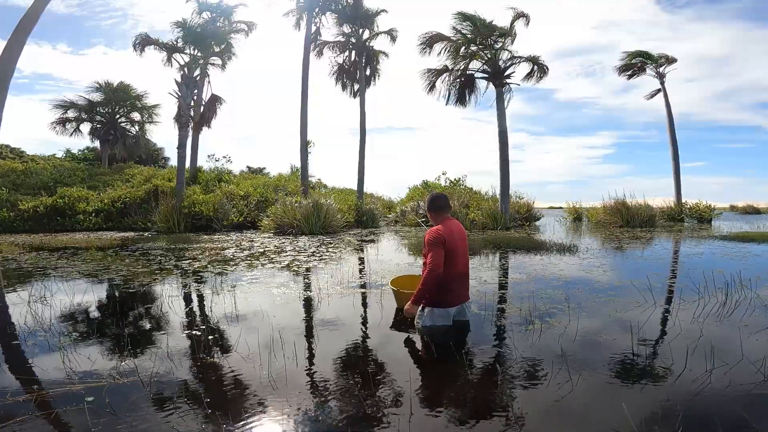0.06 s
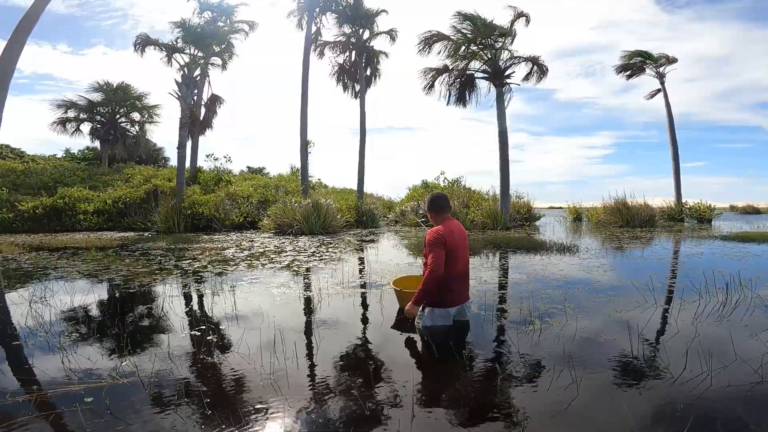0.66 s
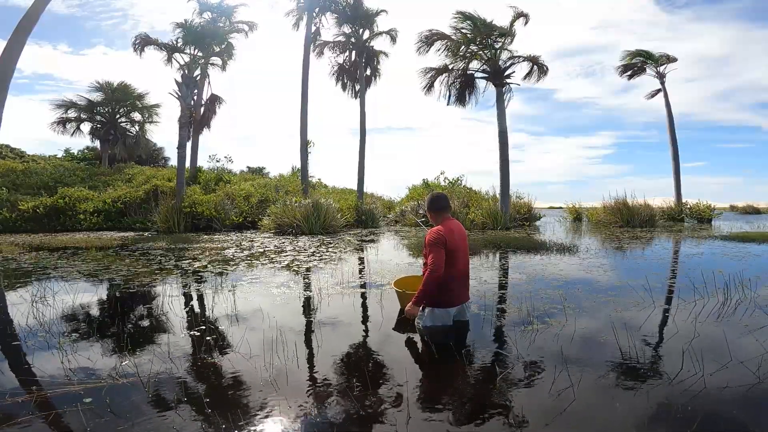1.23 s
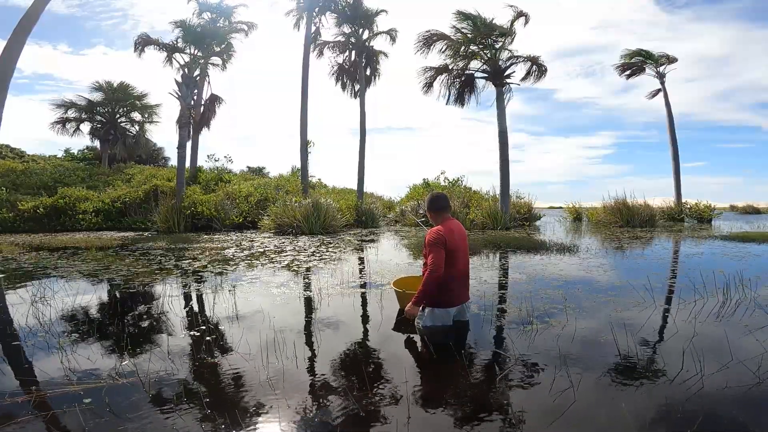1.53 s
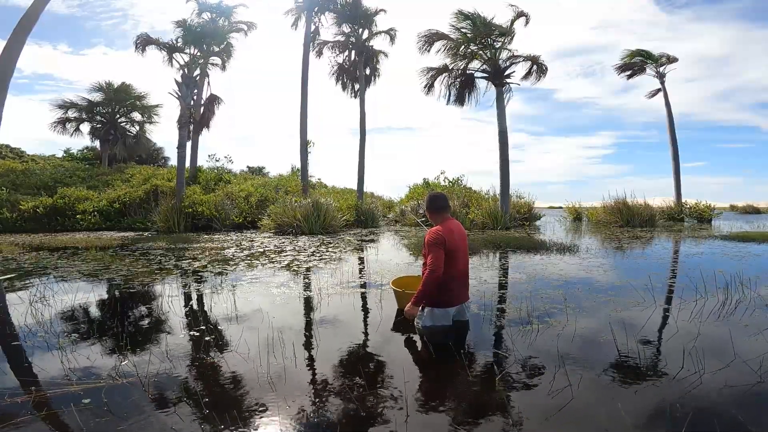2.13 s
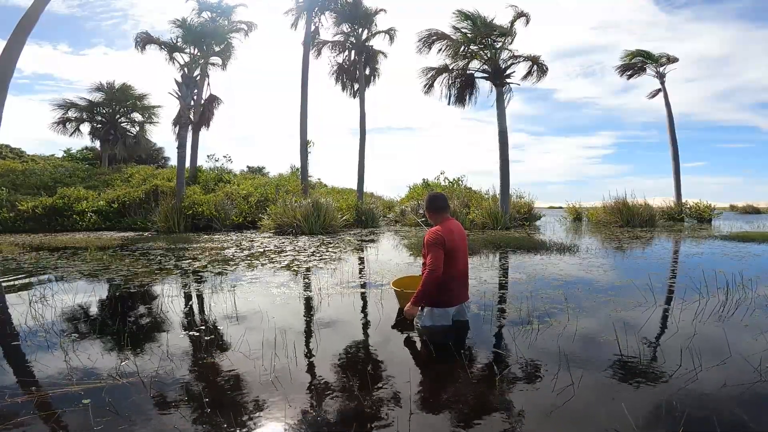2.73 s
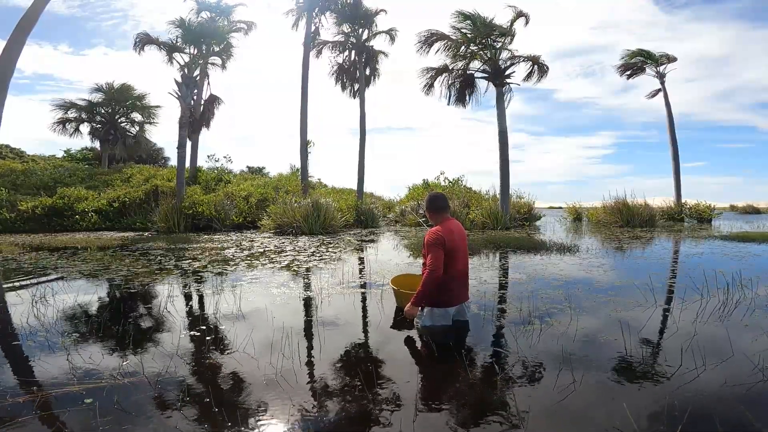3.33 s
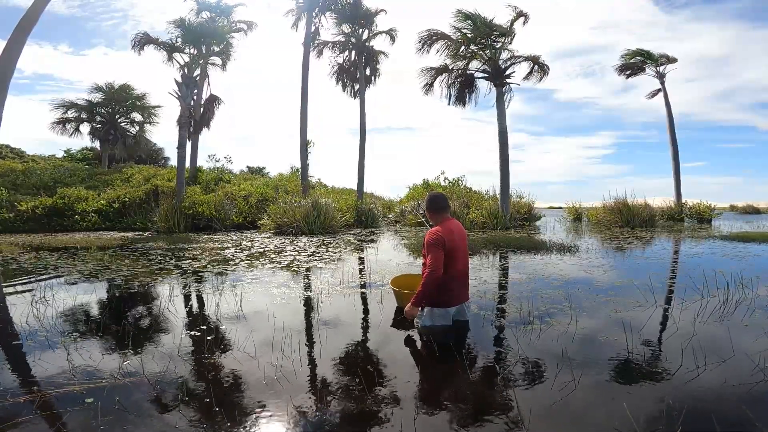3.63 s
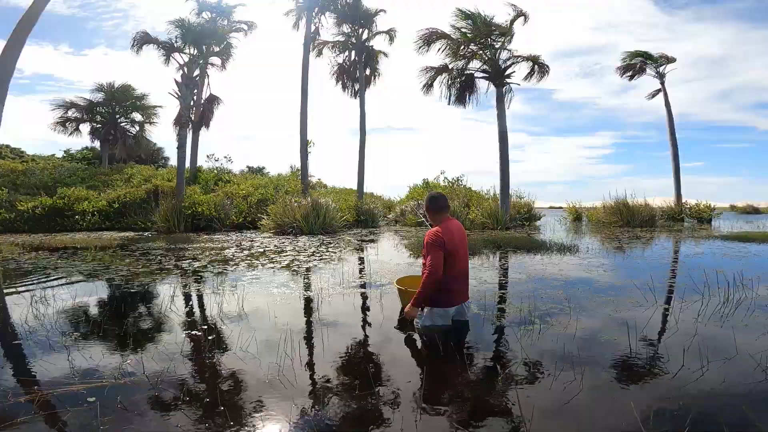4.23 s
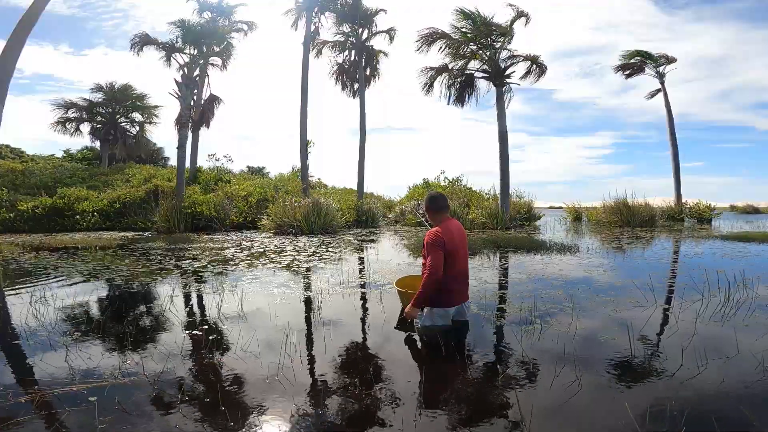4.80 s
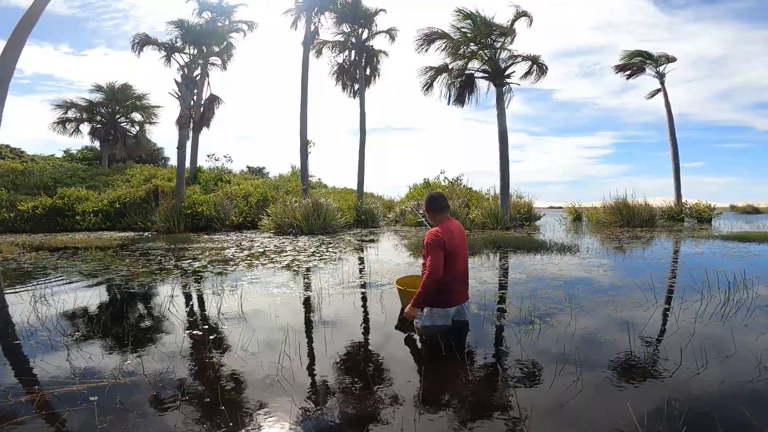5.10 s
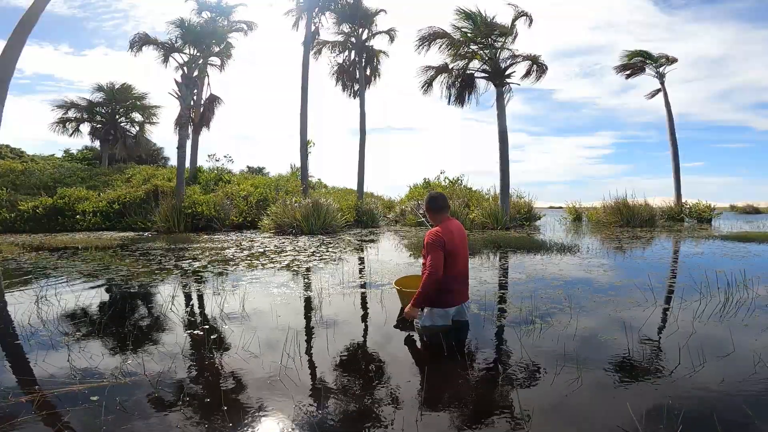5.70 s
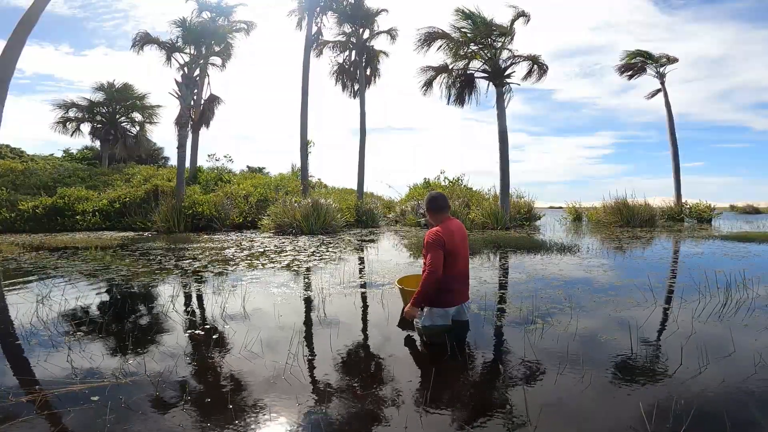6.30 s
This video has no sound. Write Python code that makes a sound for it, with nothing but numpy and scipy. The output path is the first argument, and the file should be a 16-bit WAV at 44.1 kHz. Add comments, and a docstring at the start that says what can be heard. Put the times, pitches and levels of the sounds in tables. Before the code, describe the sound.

Wind blows across a small camera's single microphone in a palm marsh. The low rumble starts light, then swells into close, fluttering buffeting with several dull thumps, strongest early in the gust. It dips for short moments and pushes up again at the end. Throughout, nearby fronds and reeds make an even hiss, and a distant thicket roars faintly.

```python
"""Wind buffeting the one microphone of a small camera, out in a flooded palm marsh.
A gust arrives after a second: eddies on the microphone port make a rolling rumble, a throb,
a faster flutter and a few blunt bumps, their bass peaks held down by the camera's limiter.
Close by, palm fronds and reeds hiss steadily, with a faint, very high shimmer early on;
farther off, a thicket roars softly."""
import sys
import numpy as np
from scipy import signal
from scipy.fft import rfft, irfft, next_fast_len
from scipy.io import wavfile
from scipy.ndimage import uniform_filter1d, minimum_filter1d, map_coordinates

SR = 44100
rng = np.random.default_rng(int(sys.argv[2]) if len(sys.argv) > 2 else 0)


def dump_mix(stems):
    """Bounce the given channels to the path in sys.argv[1] as a 16-bit WAV at rate SR."""
    frames = np.atleast_2d(stems).T  # one column per channel
    limited = np.clip(frames, -1, 1)  # hard clip at full scale
    pcm = np.round(limited * 32767).astype(np.int16)
    wavfile.write(sys.argv[1], SR, pcm)


N = 280035

# Wind in the far thicket and the near foliage. Each row: time in seconds, level in dB.
THICKET_LEVELS = [(0, -45), (1.05, -45), (1.35, -39.5), (2.25, -45), (2.7, -54), (3.4, -51.5), (3.9, -45.5),
                  (4.8, -45), (5.4, -51.5), (6.03, -50.5), (6.35, -40.5)]
RUSH_LEVELS = [(0, -42.5), (.35, -44.3), (1.07, -45), (1.18, -40), (1.65, -41.5), (1.82, -43), (1.93, -42),
               (2.4, -43.5), (3.1, -43.5), (3.65, -41.5), (4.03, -41.5), (4.17, -43.5), (4.65, -43),
               (5.05, -40.7), (5.35, -42), (6.35, -42.5)]
# Sizzle of the leaf tips. Each row: time in seconds, level in dB against the rush.
SIZZLE_LEVELS = [(0, -9.5), (.9, -7.5), (1.3, -11), (2.7, -13), (3.4, -13), (4.25, -9), (5.2, -12),
                 (6.35, -11)]
# Tone of the marsh sounds. Each row: frequency in Hz, relative level in dB.
THICKET_SPECTRUM = [(60, -34), (250, 2.5), (480, -1), (800, -3.5), (1200, -7.5), (2000, -19), (4000, -32),
                    (8000, -70)]
RUSH_SPECTRUM = [(60, -13), (300, -3.5), (700, -5.5), (1200, -0.5), (2000, -1), (3500, -2.5), (5000, -6),
                 (6500, -12), (8500, -23), (11000, -46), (14000, -76)]
SIZZLE_SPECTRUM = [(2000, -15), (4500, -1), (6300, -1), (8000, -3), (10000, -12.5), (11700, -23),
                   (13200, -31), (15000, -42)]
SHIMMER_SPECTRUM = [(10500, -55), (11800, -3), (12800, 0), (14000, -5), (15000, -14)]

# Wind at the microphone. Each row: time in seconds, rumble level in dB before lulls and gusts.
PORT_WIND = [(0, -36), (.33, -31), (.8, -32), (1.02, -31.5), (1.1, -25.5), (1.42, -21), (2.1, -19),
             (3.1, -19.5), (3.58, -23.5), (4.1, -20.5), (4.8, -20.5), (5.75, -20), (6.35, -17.5)]
# The flow leaves the port. Each row: midpoint in seconds, depth in dB, length in seconds.
PORT_LULLS = [(.2, 10.5, 0.129), (0.487, 3, 0.052), (0.618, 10, 0.052), (.93, 6, 0.118), (1.24, 3.5, .1),
              (1.73, 3, 0.078), (2.396, 3, 0.0397), (3.876, 3, 0.056), (4.028, 7.5, .06), (4.195, 5, .06),
              (4.602, 10.5, .1), (5.094, 2, 0.0485), (5.488, 8.5, .05), (5.995, 4.5, .15)]
# Short gusts on the port. Each row: midpoint in seconds, added flutter's level in dB, length in seconds.
PORT_GUSTS = [(0.068, -41.5, 0.035), (0.376, -40, .06), (0.554, -34, .045), (0.705, -40, .04),
              (0.766, -38, .04), (1.096, -27.5, .05), (1.212, -36, .04), (1.314, -31.5, .07),
              (1.487, -27, .08), (1.613, -23.5, 0.099), (1.97, -32, .16), (2.126, -27, 0.088),
              (2.256, -28.5, .04), (2.328, -26.5, .04), (2.459, -21, .05), (2.603, -36, .04),
              (2.704, -30.5, 0.027), (3.147, -35, .14), (3.358, -32.5, .04), (3.717, -33.5, .035),
              (4.137, -31, .06), (4.296, -28.5, .08), (4.394, -25.5, .035), (4.762, -34.5, .1),
              (4.89, -32, .08), (5.017, -29.5, .04), (5.212, -35.5, .06), (5.387, -39, 0.036),
              (5.54, -37.5, .04), (5.72, -37, .14), (6.196, -30, .1), (6.33, -22, .08)]
# The sharpest eddies. Each row: midpoint in seconds, level in dB, pitch in Hz, half length in cycles.
SHARP_EDDIES = [(1.089, -16.5, 168, 0.37), (1.096, -24.5, 665, 0.27), (1.109, -21.5, 169, .35),
                (1.6203, -14, 474, 0.44), (1.6312, -20, 850, .3), (1.6365, -9.5, 650, 0.28),
                (1.644, -18, 520, 0.27), (1.657, -21, 480, 0.48), (2.003, -23, 494, 0.27),
                (2.115, -22, 620, 0.16), (2.221, -25.5, 600, 0.16), (2.322, -24, 500, 0.21),
                (2.329, -20, 560, 0.18), (2.455, -22, 480, .34), (2.467, -25.5, 720, 0.16),
                (2.473, -21, 600, .25), (4.271, -22.5, 635, 0.62), (4.391, -24.5, 380, .45),
                (4.887, -27, 680, 0.99), (4.95, -28, 460, 0.26), (6.3334, -20, 530, 0.21)]
# Tone of the air on the port. Each row: frequency in Hz, relative level in dB.
RUMBLE_SPECTRUM = [(8, -30), (20, -1), (36, 0), (65, -1), (100, -8), (135, -21), (200, -45), (500, -99)]
THROB_SPECTRUM = [(50, -29), (85, -7), (110, 0), (140, -4), (180, -16), (300, -41.5), (600, -90)]
FLUTTER_SPECTRUM = [(90, -44), (140, -1), (175, 1.5), (240, -4), (320, -11.5), (420, -20.5), (600, -23.5),
                    (900, -41), (1500, -51), (3000, -91)]
PUFF_SPECTRUM = [(80, -25), (200, 9.5), (330, 6), (700, -6), (1000, -13.5), (1400, -17), (2000, -26),
                 (4000, -75)]


def amp(db):
    """Decibels to gain."""
    return 10 ** (np.asarray(db) / 20)


def unit(x):
    """Scale to rms 1."""
    return x / np.sqrt(np.mean(x ** 2) + 1e-20)


def curve(rows):
    """(seconds, value) points joined into one value per sample."""
    return np.interp(np.arange(N) / SR, *np.transpose(rows))


def bell(middle_s, length_s):
    """A bell-shaped swell of height 1."""
    return np.exp(-(2 * (np.arange(N) / SR - middle_s) / length_s) ** 2)


def wobble(rate_hz):
    """A smooth random curve, rate_hz knots a second."""
    knots = rng.standard_normal(int(N * rate_hz / SR) + 4)
    return map_coordinates(knots, [np.arange(N) * rate_hz / SR])


def smooth(x, span_s):
    """A rounded running mean."""
    width = max(int(span_s * SR), 1)
    return uniform_filter1d(uniform_filter1d(x, width), width)


def evened(x, span_s):
    """x with its running rms held near 1."""
    return x / np.sqrt(np.abs(smooth(x ** 2, span_s)) + 1e-6)


def filtered(x, response):
    """x times a response of frequency; mirrored ends keep the edges smooth."""
    margin = SR // 4
    size = next_fast_len(N + 2 * margin)
    spectrum = rfft(np.pad(x, margin, mode="reflect"), size)
    return irfft(spectrum * response(np.fft.rfftfreq(size, 1 / SR)), size)[margin:margin + N]


def coloured(x, spectrum):
    """x through (Hz, dB) points on a log axis, at rms 1."""
    points_hz, db = np.transpose(spectrum)
    return unit(filtered(x, lambda hz: amp(np.interp(np.log(hz + 1), np.log(points_hz), db))))


def rustle(spectrum, patchy_db):
    """Noise with drifting patches of gain, as different fronds catch the wind."""
    bands = signal.stft(rng.standard_normal(N), nperseg=512)[2]
    patches = uniform_filter1d(rng.standard_normal(bands.shape), size=8, axis=0)
    patches = unit(uniform_filter1d(patches, size=16, axis=1))
    noise = signal.istft(bands * amp(patchy_db * patches), nperseg=512)[1][:N]
    return coloured(noise, spectrum)


def thicket():
    """Far bushes roar softly; distance takes their treble away."""
    return amp(curve(THICKET_LEVELS)) * rustle(THICKET_SPECTRUM, patchy_db=2.0)


def shimmer(level_db=-70, full_s=.65, fade_s=1.16, rise_db_per_s=33, fall_db_per_s=269.5):
    """A thin hiss at the top of hearing swells, holds and dies quickly."""
    t = np.arange(N) / SR
    rise_db = rise_db_per_s * np.minimum(t - full_s, 0)
    fall_db = fall_db_per_s * np.minimum(fade_s - t, 0)
    return amp(level_db + rise_db + fall_db) * coloured(rng.standard_normal(N), SHIMMER_SPECTRUM)


def foliage():
    """Fronds and reeds rush near the microphone; their thin tips add a finer sizzle."""
    rush_db = curve(RUSH_LEVELS)
    rush = amp(rush_db + 0.068 * wobble(rate_hz=12)) * rustle(RUSH_SPECTRUM, patchy_db=0.46)
    sizzle = amp(rush_db + curve(SIZZLE_LEVELS)) * rustle(SIZZLE_SPECTRUM, patchy_db=.5)
    return rush + sizzle


def turbulence(spectrum, span_s):
    """Pressure noise whose strength stays even over span_s."""
    return evened(coloured(rng.standard_normal(N), spectrum), span_s)


def port_flow(steady_db=-20):
    """Rumble, throb and flutter in dB: all follow the wind and its lulls; gusts lift small eddies most."""
    wind_db = curve(PORT_WIND) - sum(depth * bell(s, length) for s, depth, length in PORT_LULLS)
    throb_db = -31 + 0.95 * (wind_db - steady_db)
    flutter_db = -41 + .6 * (wind_db - steady_db)
    gust_power = sum(amp(db) ** 2 * bell(s, length) for s, db, length in PORT_GUSTS)
    lift_db = 10 * np.log10(1 + gust_power / amp(flutter_db) ** 2)
    return wind_db + 0.19 * lift_db, throb_db + 0.55 * lift_db, flutter_db + lift_db


def weak_eddies(flutter_db, count, db=-34.5, scatter_db=0.5, hz=500, scatter_octaves=0.31, cycles=0.35):
    """Rows like SHARP_EDDIES at random moments, most often where the flutter is strong."""
    chance = np.cumsum(amp(flutter_db) ** 2)
    draws = (np.arange(count) + rng.random(count)) / count
    times = np.searchsorted(chance / chance[-1], draws) / SR
    return [(s, db + scatter_db * size, hz * 2 ** (scatter_octaves * pitch), cycles)
            for s, (size, pitch) in zip(times, rng.standard_normal((count, 2)))]


def bumps(eddies, tear_db=-11.5, tear_s=0.0034):
    """Each eddy jolts the port for a cycle or two; the more abrupt, the louder its puff of torn air."""
    near = np.arange(-SR // 80, SR // 80)
    jolts, puffs = np.zeros(N), np.zeros(N)
    for (s, db, hz, cycles), phase in zip(eddies, rng.uniform(0, 2 * np.pi, len(eddies))):
        i = np.clip(round(s * SR) + near, 0, N - 1)
        offset_s = i / SR - s
        turns = offset_s * hz
        jolts[i] += amp(db) * np.cos(2 * np.pi * turns + phase) / np.cosh(turns / cycles)
        puffs[i] += amp(db + tear_db) / (np.pi * cycles) * np.exp(-.5 * (offset_s / tear_s) ** 2)
    return jolts + puffs * turbulence(PUFF_SPECTRUM, span_s=0.0036)


def buffeting(rumble_db, throb_db, flutter_db, bunching_db=4.86, surge_db=1.7, sway_db=1.1):
    """Large eddies roll over the port and break into smaller ones, which ride on their pressure peaks."""
    large = turbulence(RUMBLE_SPECTRUM, span_s=0.055)
    middle = turbulence(THROB_SPECTRUM, span_s=0.026)
    middle *= unit(amp(bunching_db * wobble(rate_hz=35)))
    small = turbulence(FLUTTER_SPECTRUM, span_s=0.044) * (1 + 0.33 * large ** 2)
    small = evened(small, span_s=0.047)  # the peaks bunch the flutter without making it louder
    surge = amp(surge_db * wobble(rate_hz=27))  # the flow falters for all sizes at once
    rumble = amp(rumble_db + sway_db * wobble(rate_hz=22)) * large
    return surge * (rumble + amp(throb_db) * middle + amp(flutter_db) * small)


def scene():
    """The marsh behind, the wind right on the microphone, in mono."""
    marsh = thicket() + foliage() + shimmer()
    rumble_db, throb_db, flutter_db = port_flow()
    port = buffeting(rumble_db, throb_db, flutter_db)
    port += bumps(list(SHARP_EDDIES) + weak_eddies(flutter_db, count=20))
    return (marsh + port)[None]


def limited(x, ceiling, hold_s):
    """A fast limiter: the gain dips just enough to keep each peak under the ceiling."""
    needed = np.minimum(1, ceiling / (np.abs(x) + 1e-9))
    gain = minimum_filter1d(needed, max(int(hold_s * SR), 1))
    return x * smooth(gain, hold_s / 2)


def record(dry):
    """The camera limits the bass separately and keeps nothing above its band limit."""
    split_hz, top_hz = 300, 15000
    bass = filtered(dry[0], lambda hz: 1 / (1 + (hz / split_hz) ** 4))
    held_bass = limited(bass, ceiling=.27, hold_s=.012)
    return filtered(dry[0] - bass + held_bass, lambda hz: hz < top_hz)[None]


dry = scene()
out = record(dry)
dump_mix(out)
```